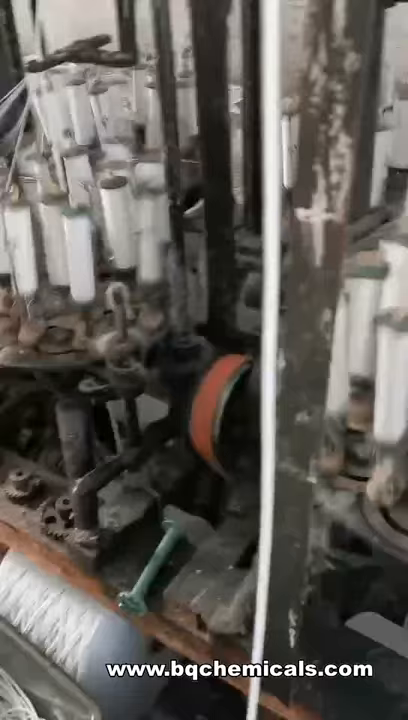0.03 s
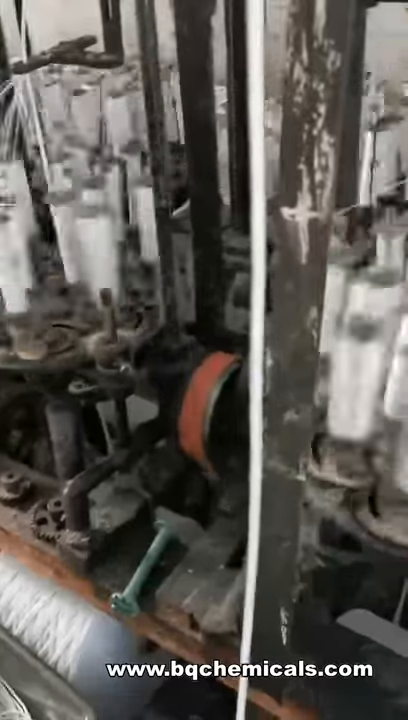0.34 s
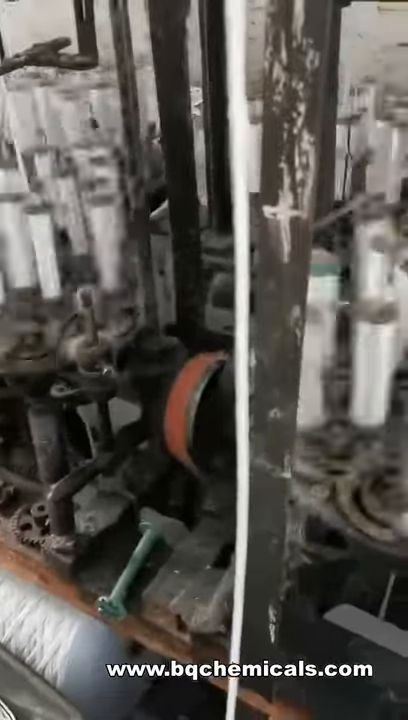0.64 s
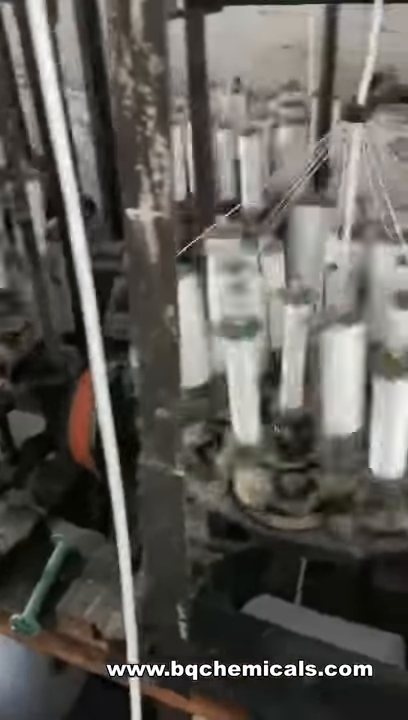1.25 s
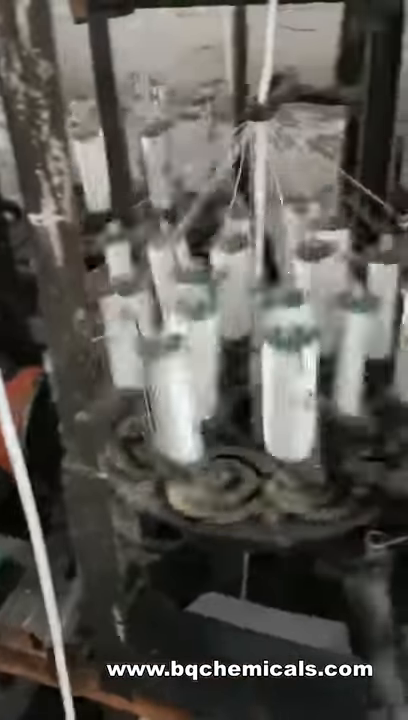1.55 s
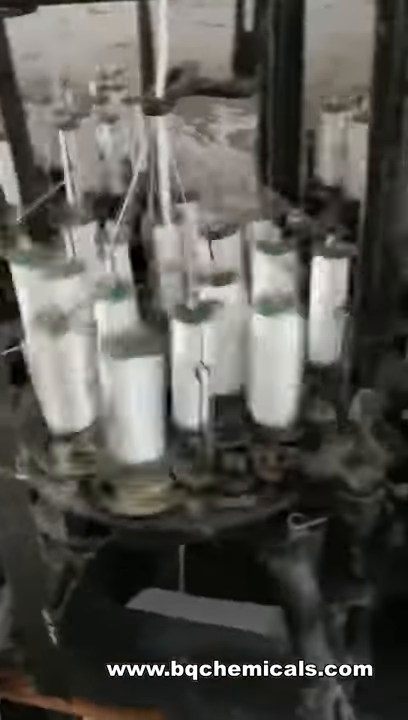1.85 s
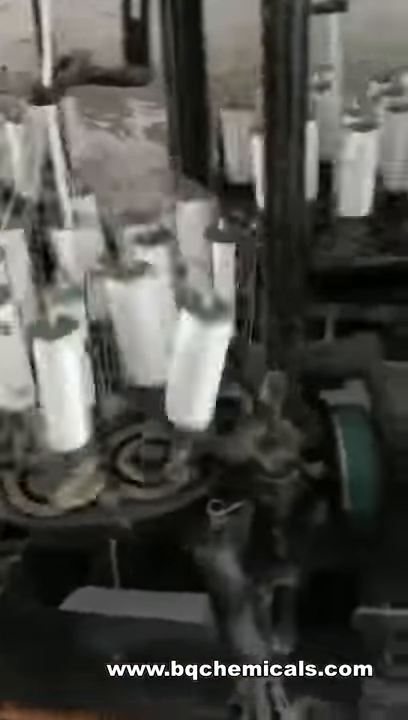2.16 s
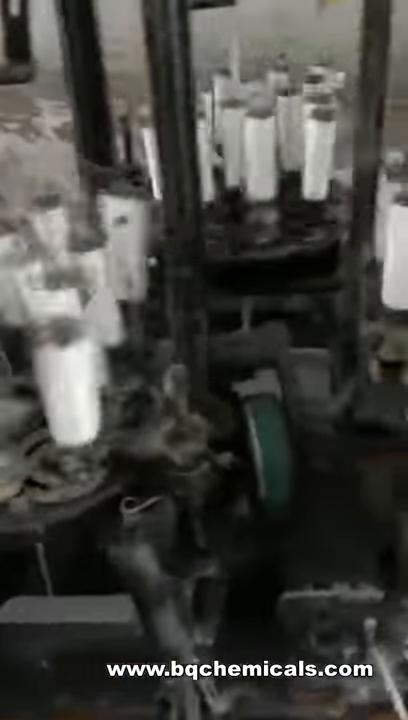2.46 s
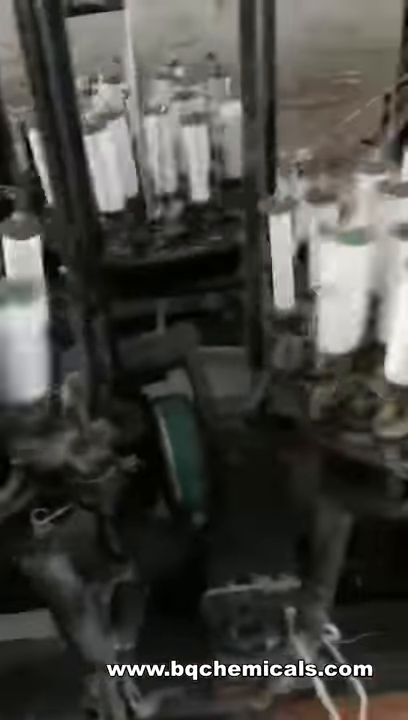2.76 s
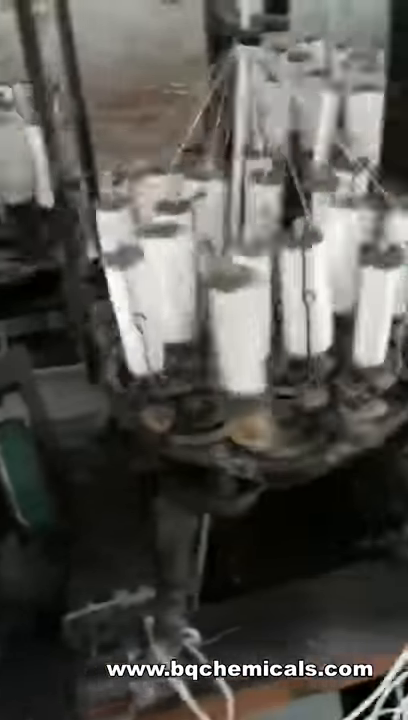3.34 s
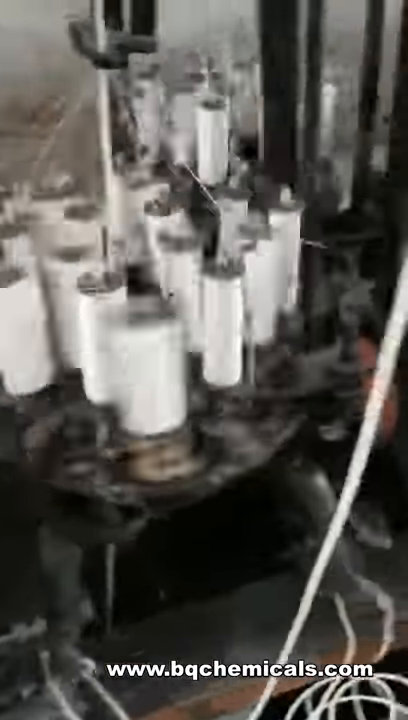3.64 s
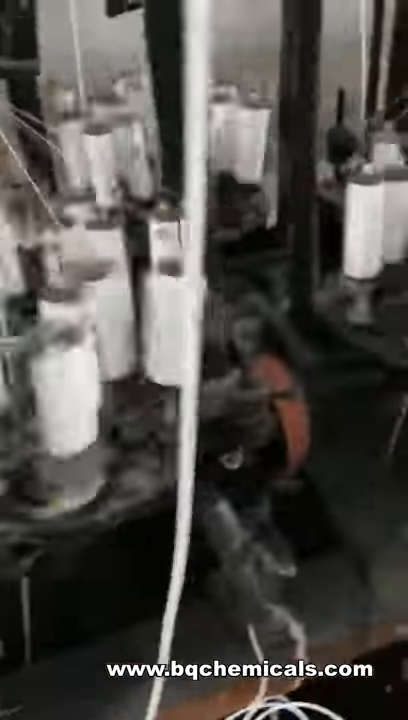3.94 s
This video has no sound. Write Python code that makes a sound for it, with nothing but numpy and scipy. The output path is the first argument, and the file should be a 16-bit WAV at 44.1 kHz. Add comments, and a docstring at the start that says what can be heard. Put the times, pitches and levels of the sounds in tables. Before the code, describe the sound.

Braiding machines cut in abruptly at about 0.4 seconds and clatter loudly until the end, near 4 seconds. Close bobbin carriers rattle rapidly on iron, with small steel parts jingling and clinking over a faint motor hum and the factory hall's steady roar. A metallic ringing surges slightly to the right, with brief, sharper rasps strongest around 1.9 to 2.6 seconds and again near 3.8.

```python
"""Factory hall, in an aisle between rows of running braiding machines.
Bobbin carriers knock from horn gear to horn gear and rattle on their iron decks; the nearest track
rings in surges. Steel parts clink, motors hum, and the farther machines merge into one loud din."""
import sys
import numpy as np
from scipy import signal
from scipy.fft import rfft, irfft
from scipy.io import wavfile

SR = 44100
rng = np.random.default_rng(int(sys.argv[2]) if len(sys.argv) > 2 else 0)


def generate_wav(sig):
    """Save sig (samples, or channels by samples) to the path in sys.argv[1] as 16-bit PCM at SR."""
    pcm = np.round(np.clip(np.atleast_2d(sig).T, -1, 1) * 32767).astype(np.int16)
    wavfile.write(sys.argv[1], SR, pcm)


N = 176400

# swell of the machine noise: time_s, swell_steps
MACHINE_SWELL = [(0.36, -0.6), (0.54, -0.55), (0.68, 1), (0.74, -0.5), (0.88, 1), (1.0, -0.54), (1.38, 0.4),
                 (1.52, -0.5), (1.61, 0.5), (1.7, -0.6), (1.96, 0.2), (2.04, 0), (2.24, 0.5), (2.36, 0.3),
                 (2.54, 0.1), (2.64, -0.25), (2.8, 0.5), (2.84, -0.5), (3.2, 0), (3.3, -0.6), (3.44, 0),
                 (3.48, -0.2), (3.72, 0.5), (3.76, 0), (3.82, 0.5), (3.86, -1), (3.9, 1), (3.98, -0.2)]
# iron track resonances: centre_hz, half_width_hz, left_db, right_db
TRACK_MODES = [(2170, 140, -50, -38.5), (2300, 420, -51, -40.5), (2850, 150, -49, -42),
               (1500, 180, -48, -42), (4931, 30, -52, -49.5), (8160, 100, -60, -49)]


def clatter(share):
    """Near machines: each carrier hand-over lifts a steady rattle on two spots of an iron deck."""
    # handovers_per_s, relative_db, left_minus_right_db
    machines = [(12.6, 1.5, -2.5), (15.4, -0.5, 3), (17.6, 2, -2.5), (13.6, 3.5, -2.5)]
    rattle_floor, decay_s, spots = .83, .023, 2
    out = np.zeros((2, N))
    for rate, db, pan_db in machines:
        handovers = np.cumsum(rate * (1 + .03 * drift(2))) / SR + rng.random()
        since_s = (handovers % 1) / rate
        impacts = (rattle_floor + np.exp(-since_s / decay_s)) * knocks(per_s=520, spread_db=2.5)
        spot = rng.integers(0, spots, N)
        rattle = sum(signal.oaconvolve((impacts * (spot == k))[None], deck(), axes=1)[:, :N]
                     for k in range(spots))
        out += unit(rattle) * amp([[db + pan_db / 2], [db - pan_db / 2]])
    return coloured(unit(out), share) * swell(MACHINE_SWELL, step_db=1.8, base_db=-1.78)


def deck(crack_s=.0007, t60_s=.21, tail_share=.78):
    """One knock on an iron deck: a crack, then a tail of dense modes, different at each ear."""
    t = np.arange(SR // 3) / SR
    crack, tail = rng.standard_normal((2, 2, len(t)))
    spectrum = rfft(crack * np.exp(-t / crack_s))
    crack = np.roll(irfft(spectrum / abs(spectrum), len(t)), SR // 300, axis=1)
    return np.sqrt(1 - tail_share) * unit(crack) + np.sqrt(tail_share) * unit(tail * decay(t, t60_s))


def track(wander_hz=25):
    """Carriers chatter along the nearest track; its resonances shift a little as they travel."""
    # surges of the ring: time_s, swell_steps
    surges = [(0.36, 1), (0.62, 2.5), (0.8, 0.5), (0.86, 1.3), (1.08, 0.5), (1.15, -3), (1.22, 1.5),
              (1.34, 1.5), (1.52, -2), (1.6, 3.5), (1.8, -0.5), (1.94, 3.5), (2.06, 1), (2.32, 3),
              (2.42, -16), (2.46, -3), (2.52, -9), (2.58, 4), (2.62, 1), (2.7, -1), (2.74, -1), (3.54, 2),
              (3.58, -5), (3.64, 1), (3.74, -7), (3.8, 4), (3.84, -14), (3.98, 3.5)]
    out = np.zeros((2, N))
    chatter = np.array([knocks(per_s=420, spread_db=-1.5) for _ in range(2)])
    for centre_hz, half_width_hz, left_db, right_db in TRACK_MODES:
        hz = centre_hz + wander_hz * drift(per_s=9)
        out += unit(resonate(chatter, hz, 2 * half_width_hz)) * amp([[left_db], [right_db]])
    return out * swell(surges, step_db=2.3)


def noise_bursts(pan_db=-7):
    """Brief, quickly dying noise bursts near 2.2 kHz in the clatter."""
    # start_s, centre_hz, right_db
    bursts = [(.581, 2300, -34), (1.218, 1900, -30), (1.338, 2500, -31), (1.6, 2250, -30),
              (1.885, 2200, -29), (1.945, 2350, -24), (2.016, 2400, -26), (2.192, 2300, -31),
              (2.32, 2300, -29), (2.447, 2200, -31), (2.548, 2200, -25.5), (2.586, 2200, -29),
              (3.625, 2300, -32), (3.783, 2250, -25.5)]
    out, t = np.zeros((2, N)), np.arange(SR // 4) / SR
    for start_s, hz, db in bursts:
        band = unit(resonate(rng.standard_normal((2, len(t))), hz, width_hz=400))
        add(out, start_s, band * decay(t, t60_s=.14) * amp([[db + pan_db], [db]]))
    return out


def clinks():
    """Struck steel parts of the carriers ring briefly over the clatter."""
    # start_s, pitch_hz, left_db, right_db
    strikes = [(.357, 3763, -29, -31), (.398, 3815, -29, -32), (.42, 4940, -37, -35), (.48, 4915, -35, -34),
               (.679, 3838, -33, -35), (.775, 4925, -35, -33), (.81, 4960, -35, -33),
               (1.089, 3768, -33, -33), (1.125, 4920, -37, -35), (1.328, 2821, -39, -30),
               (1.47, 4935, -38, -35), (1.555, 4900, -37, -33), (1.589, 3383, -43, -30),
               (1.793, 3405, -41, -31), (1.805, 4880, -32, -29), (1.81, 3830, -36, -33),
               (1.875, 3410, -43, -33), (1.935, 2234, -46, -27.5), (1.985, 2830, -36, -28),
               (2.08, 4930, -38, -34), (2.138, 3402, -39, -31), (2.505, 3811, -35, -31),
               (2.552, 2148, -39, -28), (2.778, 3782, -28, -35), (3.515, 3784, -32, -32),
               (3.783, 2218, -37, -29), (3.804, 3758, -34, -36), (3.885, 3790, -35, -35)]
    out = np.zeros((2, N))
    for start_s, hz, left_db, right_db in strikes:
        add(out, start_s, amp([[left_db], [right_db]]) * steel(hz, t60_s=.55))
    return out


def jingle(count=800, low_hz=2450, high_hz=9500, spread_db=8, level_db=-34):
    """Many small steel parts chink, each at its own pitch."""
    out = np.zeros((2, N))
    for when, pitch, strength in rng.random((count, 3)):
        hz = low_hz * (high_hz / low_hz) ** pitch
        add(out, when * N / SR, amp(spread_db * strength) * steel(hz, t60_s=.13))
    return amp(level_db) * unit(coloured(out, share=1))


def steel(hz, t60_s, rise_s=.001):
    """One dying mode of a small steel part, with its own phase at each ear."""
    t = np.arange(0, t60_s, 1 / SR)
    envelope = np.minimum(t / rise_s, 1) * decay(t, t60_s)
    return envelope * np.sin(2 * np.pi * (hz * t + rng.random((2, 1))))


def motors(pan_db=1.7):
    """Mains hum beats against slightly slower motor tones, swelling and sinking."""
    # pitch_hz, level_db, waver_depth
    tones = [(100, -51, .05), (90, -58.5, .15), (96.3, -63, .2)]
    # swell of the hum: time_s, gain_db
    hum_swell = [(.36, -4), (.58, -2), (.64, 1.5), (.76, 0), (.87, 3.5), (1, -1.5), (1.17, 1), (1.3, 0),
                 (1.45, 1.5), (1.6, -.5), (2.1, .5), (2.42, -.5), (2.53, 2.5), (2.66, -1), (2.8, 3.5),
                 (2.96, -1), (3.09, 3), (3.24, -1.5), (3.5, -.5), (3.98, -1.5)]
    hum, t = np.zeros(N), np.arange(N) / SR
    for hz, db, waver in tones:
        peak = amp(db) * np.sqrt(2) * (1 + waver * drift(2.5))
        hum += peak * np.sin(2 * np.pi * (hz * t + rng.random()) + waver * drift(1.3))
    return hum * swell(hum_swell) * amp([[pan_db], [-pan_db]])


def din(share):
    """Far machines, smeared by the hall into a steady roar."""
    return coloured(rng.standard_normal((2, N)), share) * swell(MACHINE_SWELL, base_db=-.48)


def coloured(x, share, lift_db=1.5, lift_width_hz=600):
    """Shapes stereo sound to a power share of the machine spectrum; the bass is near mono."""
    # machine noise spectrum: freq_hz, left_db_per_hz, right_db_per_hz
    colour = [(22, -83.5, -85.0), (40, -76, -74), (52, -79, -87), (76.5, -64, -64), (121, -71.5, -70),
              (211, -69, -70), (377, -66, -63.5), (527, -71.5, -63), (596, -66.5, -63.0),
              (756, -62.5, -62.5), (1460, -65.5, -58.5), (2190, -62.5, -58.5), (3030, -64.5, -60.5),
              (3900, -63.5, -64), (4670, -63.0, -61.5), (5700, -65.5, -62.5), (7520, -70.5, -67.5),
              (7750, -69, -64), (8040, -68.5, -63), (9270, -63, -65), (10160, -70, -67.5),
              (10470, -69, -63.5), (12000, -76.5, -70), (14000, -76.5, -76), (15300, -86, -73.5)]
    # likeness of the ears: freq_hz, correlation
    likeness = [(60, 0.99), (110, 1), (200, 0.87), (380, 0.74), (700, 0.32), (1300, 0.004), (15000, 0)]
    same = np.clip(by_hz(likeness), -1, 1)
    left, right = rfft(x)
    left = same * right + np.sqrt(1 - same ** 2) * left
    density_db = np.array([by_hz(colour, column=1), by_hz(colour, column=2)])
    # broad, gentle lift around the track's ring
    from_mode_hz = np.fft.rfftfreq(N, 1 / SR) - TRACK_MODES[0][0]
    density_db += lift_db * np.exp(-(from_mode_hz / lift_width_hz) ** 2)
    return irfft(np.array([left, right]) * amp(density_db) * np.sqrt(share * SR / 2), N)


def knocks(per_s, spread_db):
    """Random impacts of uneven strength."""
    struck = rng.random(N) < per_s / SR
    size = np.minimum(rng.exponential(1, N), 4)
    return struck * rng.choice([-1, 1], N) * amp(spread_db * size)


def resonate(x, hz, width_hz):
    """Resonance at a steady or moving pitch, applied twice for steep sides."""
    turn = np.exp(2j * np.pi * np.cumsum(hz * np.ones(x.shape[1])) / SR)
    r = np.exp(-np.pi * width_hz / SR)
    return (turn * signal.lfilter([(1 - r) ** 2], [1, -2 * r, r * r], x / turn)).real


def drift(per_s):
    """Slow random wander, rms 1."""
    lowpass = np.exp(-(np.fft.rfftfreq(N, 1 / SR) / per_s) ** 2)
    return unit(irfft(rfft(rng.standard_normal(N)) * lowpass, N))


def swell(table, step_db=1, base_db=0):
    """Gain at every sample from a level curve."""
    return amp(base_db + step_db * np.interp(np.arange(N) / SR, *np.transpose(table)))


def by_hz(table, column=1):
    """One column of a spectrum table at every frequency."""
    rows = np.array(table)
    return np.interp(np.log(np.fft.rfftfreq(N, 1 / SR) + 1), np.log(rows[:, 0] + 1), rows[:, column])


def decay(t, t60_s):
    """Falls 60 dB in t60_s."""
    return np.exp(-np.log(1000) * t / t60_s)


def amp(db):
    """Decibels to gain."""
    return 10 ** (np.asarray(db) / 20)


def unit(x):
    """Scales to rms 1."""
    return x / np.sqrt(np.mean(x ** 2) + 1e-20)


def add(mix, start_s, sound):
    """Mixes a stereo sound in at start_s."""
    part = mix[:, int(start_s * SR):][:, :sound.shape[1]]
    part += sound[:, :part.shape[1]]


def scene():
    """The whole hall."""
    # near clatter's part of the noise, the rest being far din: freq_hz, power_share
    near_share = [(150, 0.02), (500, 0.34), (1500, 0.52), (5000, 0.39), (9000, 0.72), (15000, 1)]
    near = np.clip(by_hz(near_share), 0, 1)
    return din(1 - near) + clatter(near) + track() + noise_bursts() + clinks() + jingle() + motors()


def record(dry):
    """The sound cuts in abruptly and is band-limited."""
    start_s, fade_s, edge_hz = .357, .0052, 15520
    gate = np.clip((np.arange(N) / SR - start_s) / fade_s + .5, 0, 1)
    lowpass = signal.firwin(1023, edge_hz, window=("kaiser", 9), fs=SR)
    return signal.oaconvolve(dry * gate, lowpass[None], "same")


dry = scene()
out = record(dry)
generate_wav(out)
```